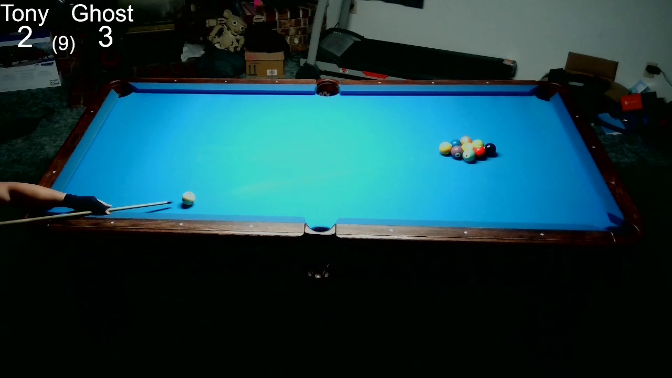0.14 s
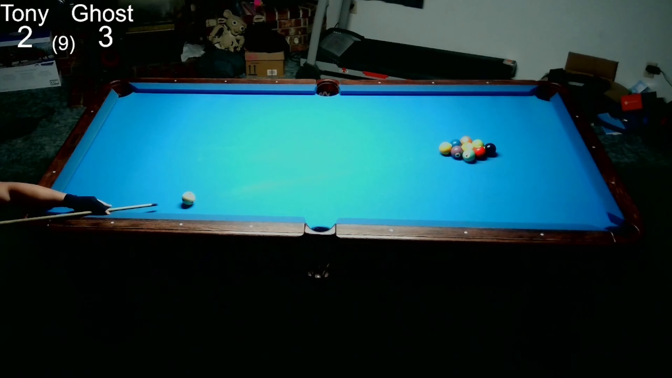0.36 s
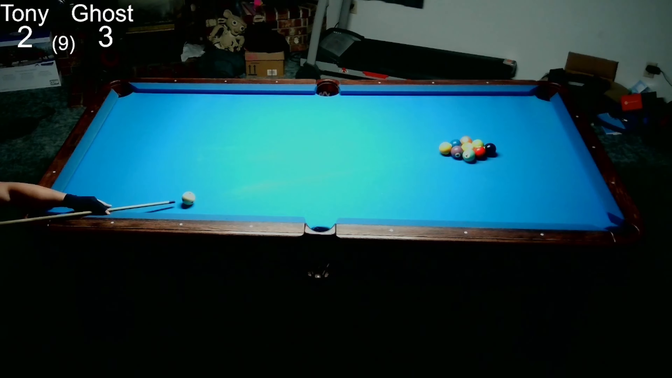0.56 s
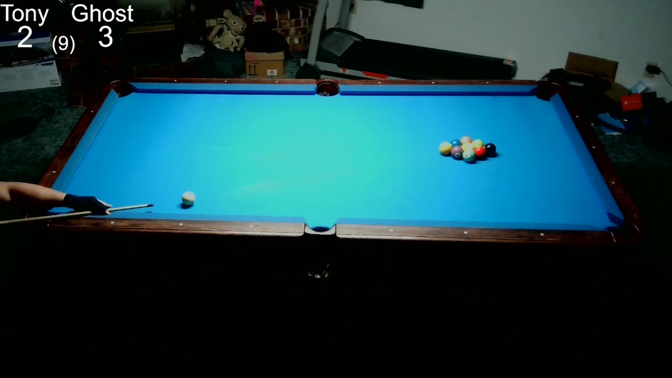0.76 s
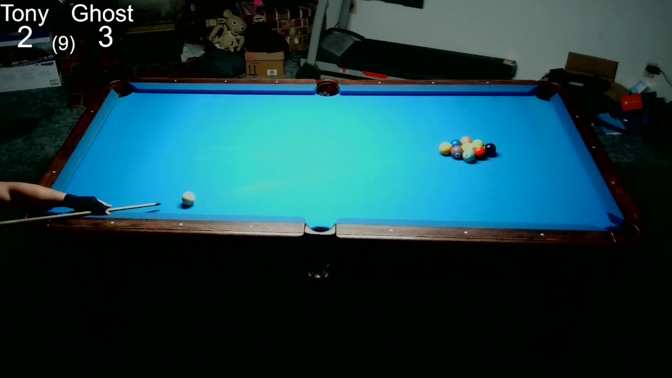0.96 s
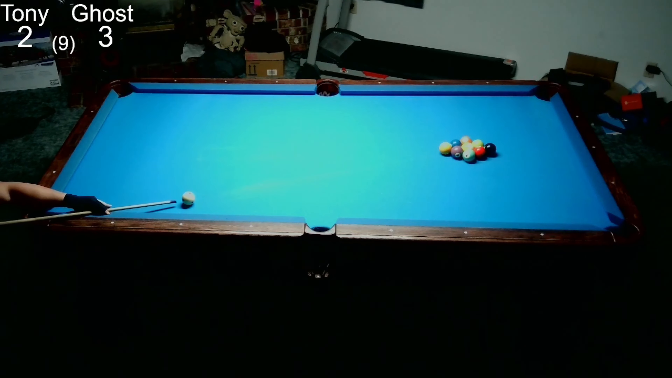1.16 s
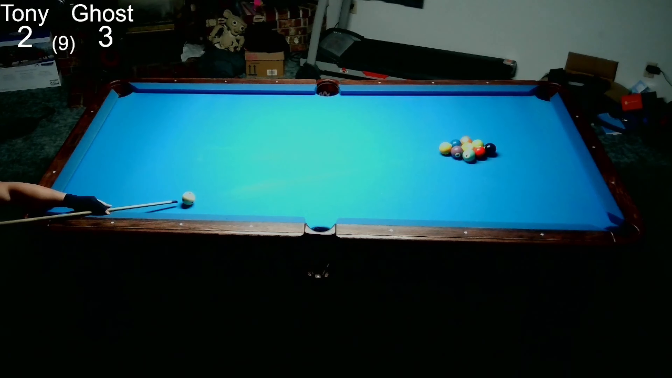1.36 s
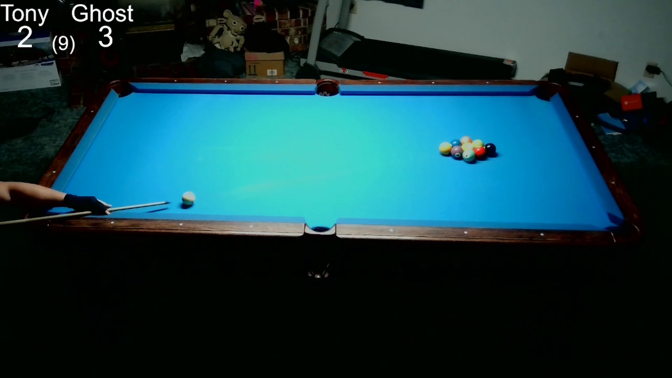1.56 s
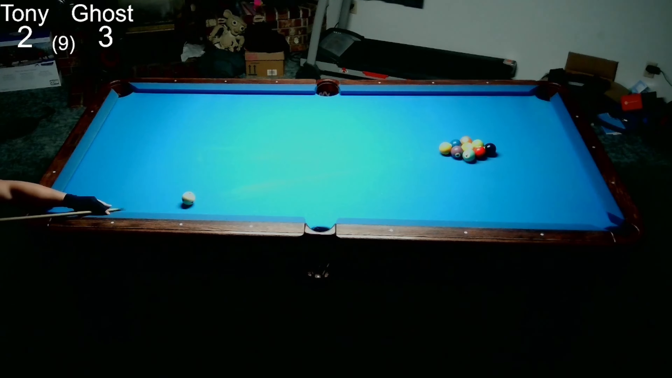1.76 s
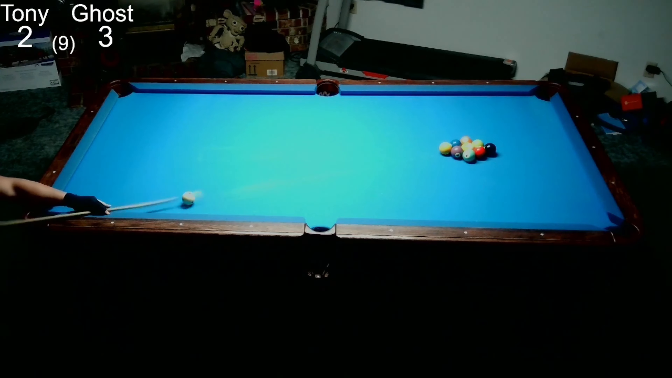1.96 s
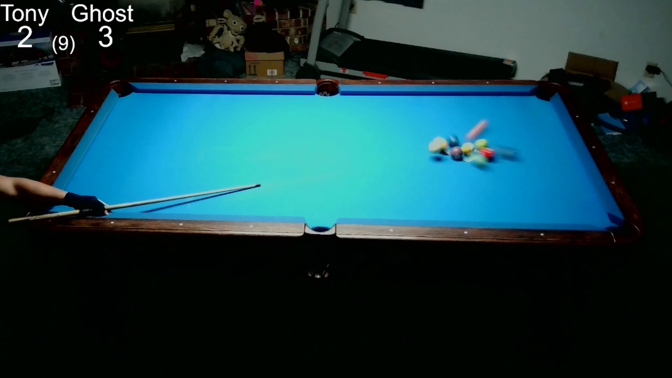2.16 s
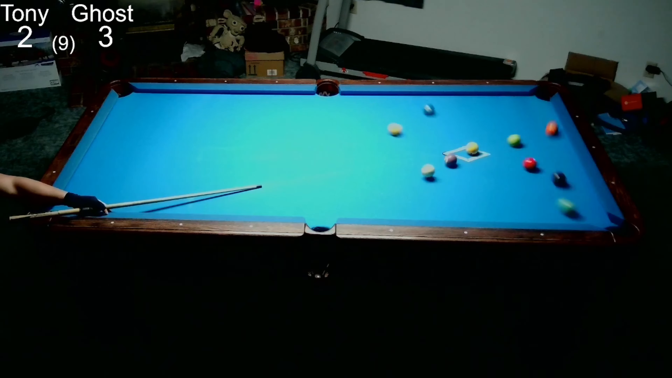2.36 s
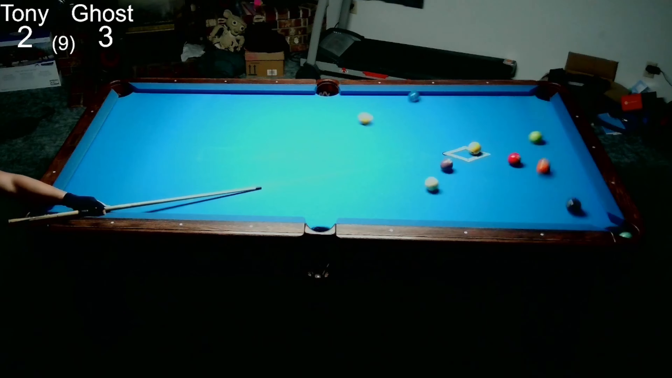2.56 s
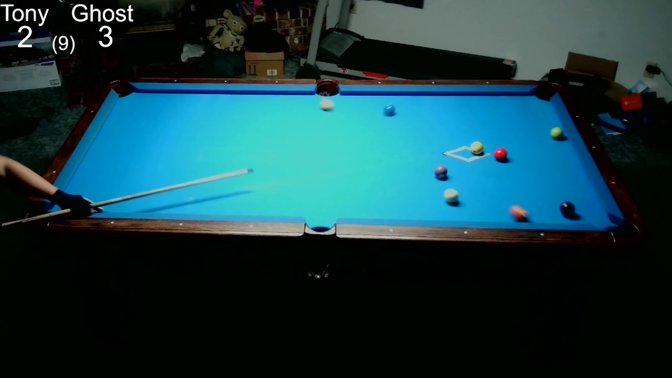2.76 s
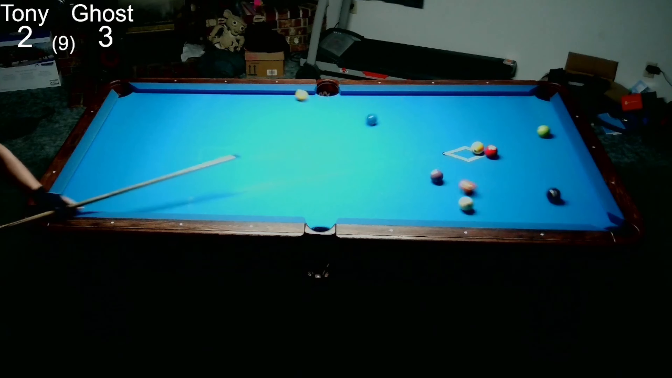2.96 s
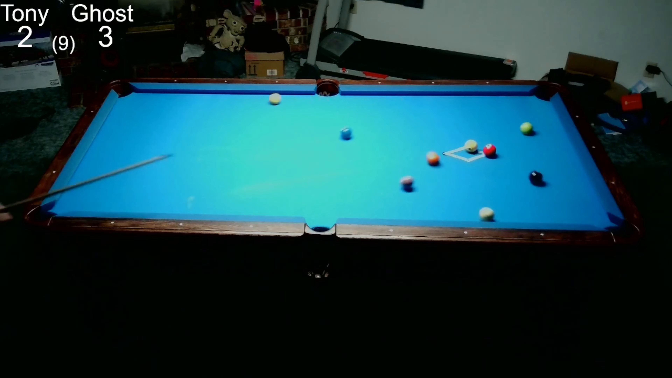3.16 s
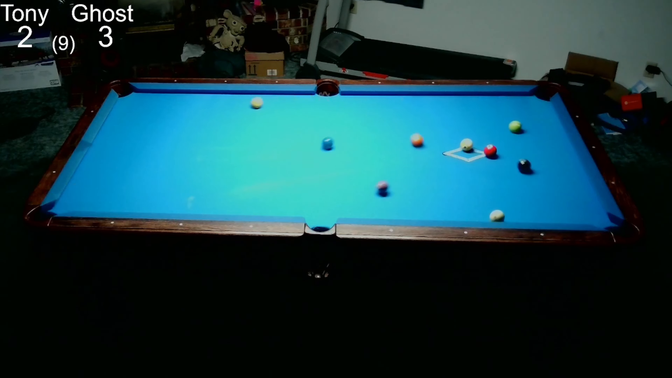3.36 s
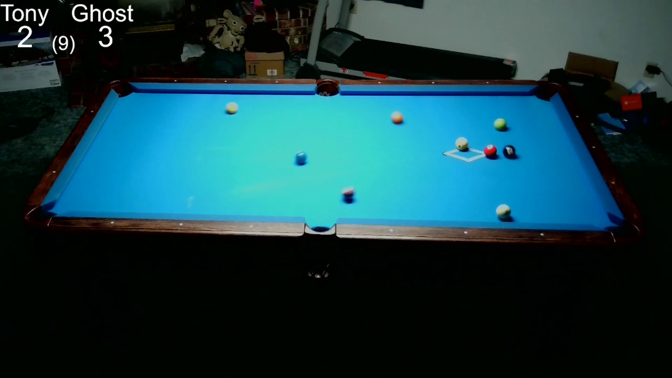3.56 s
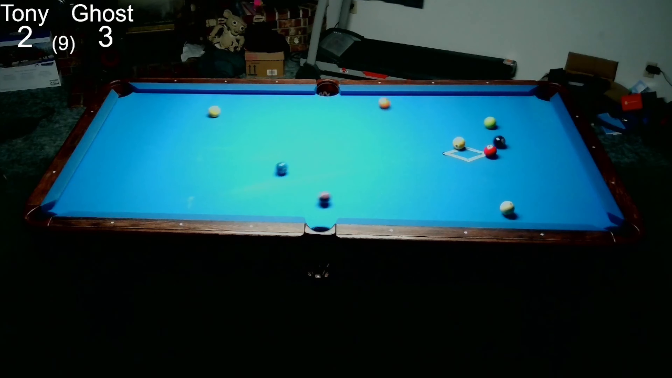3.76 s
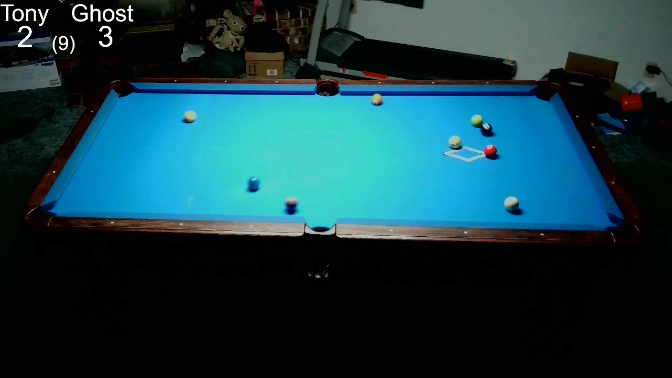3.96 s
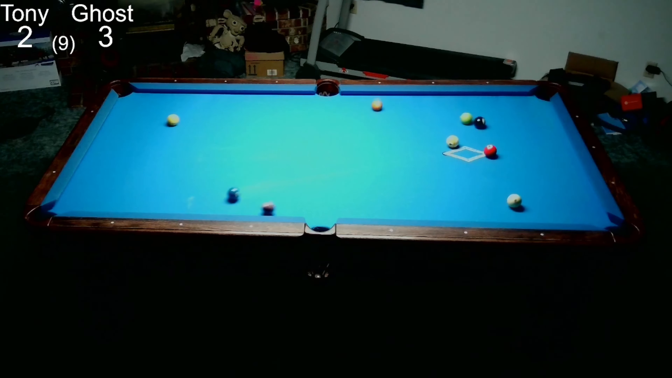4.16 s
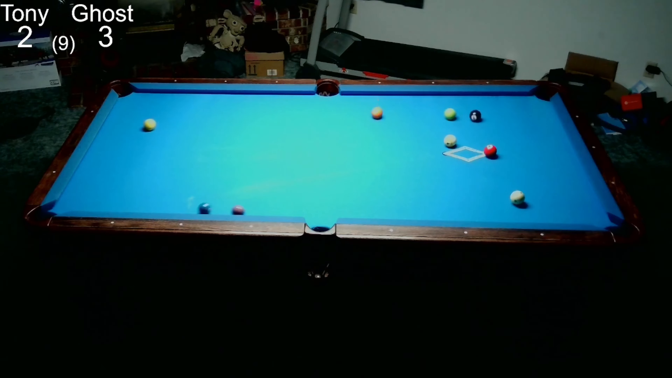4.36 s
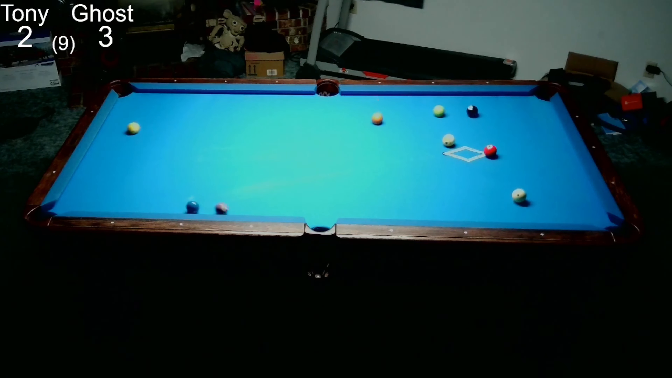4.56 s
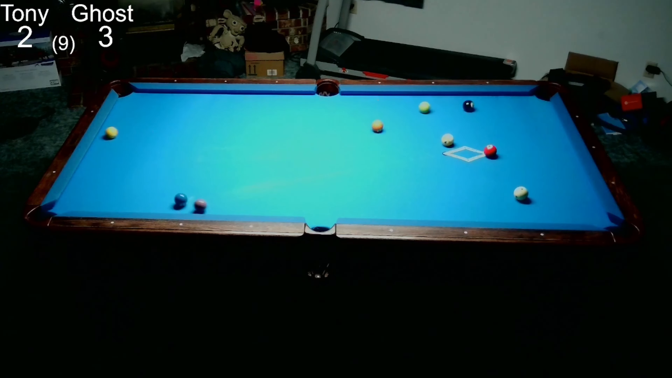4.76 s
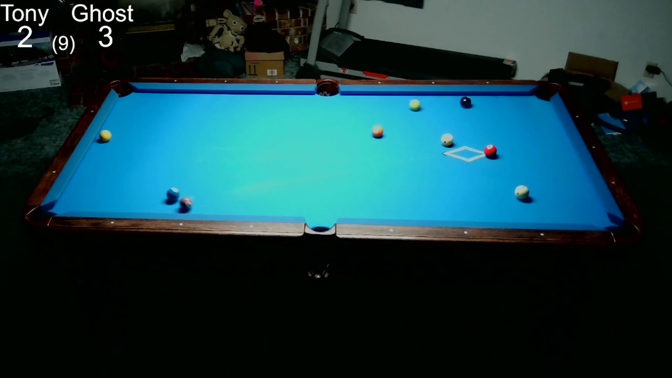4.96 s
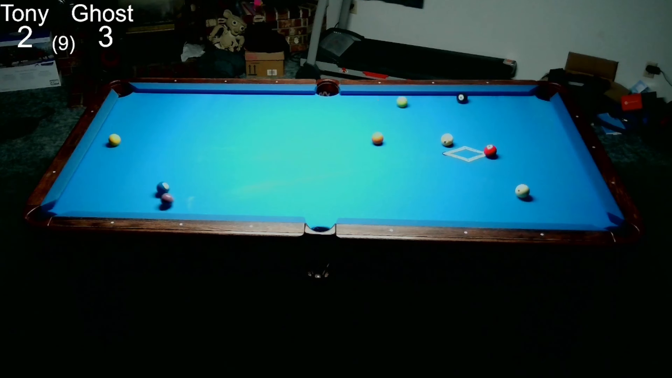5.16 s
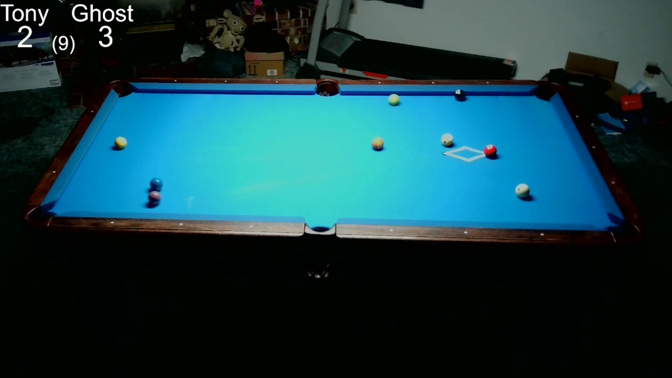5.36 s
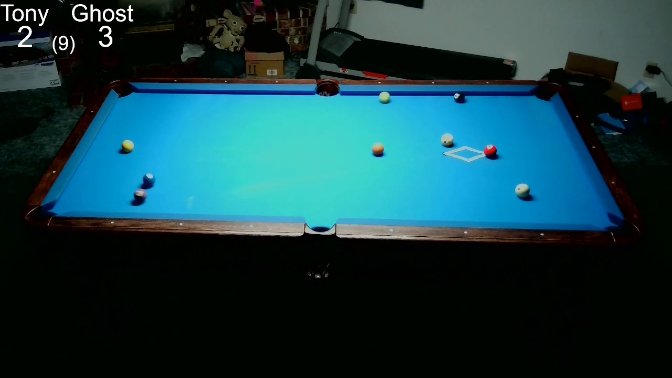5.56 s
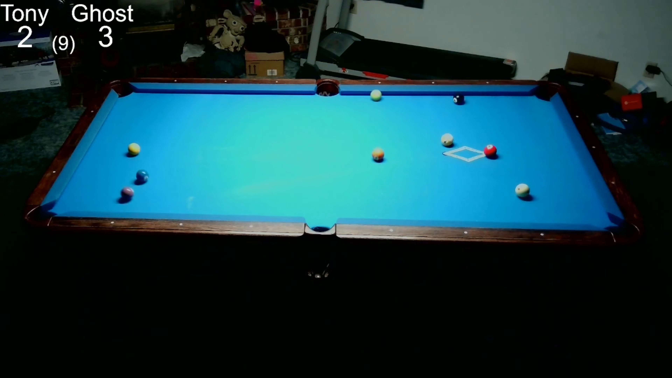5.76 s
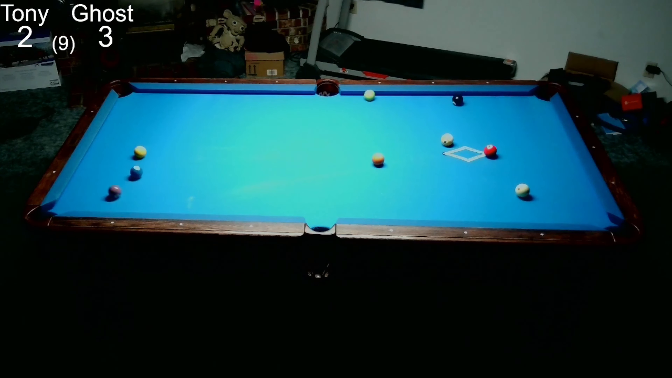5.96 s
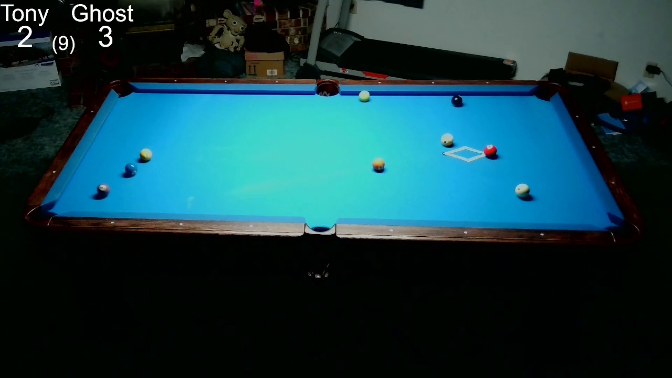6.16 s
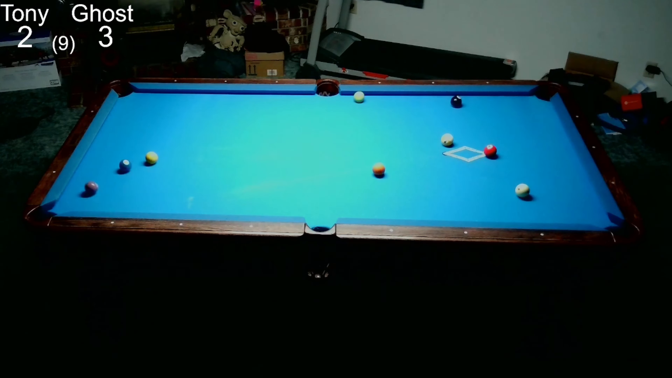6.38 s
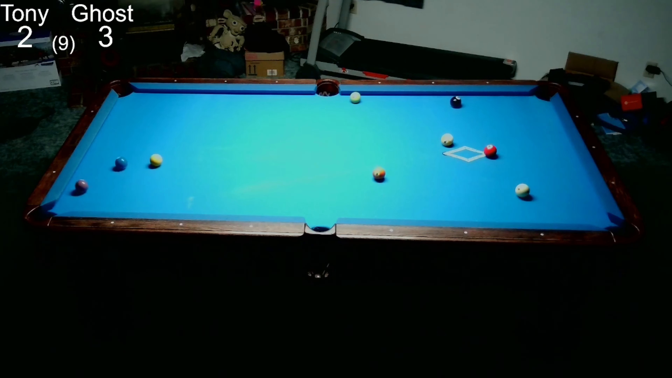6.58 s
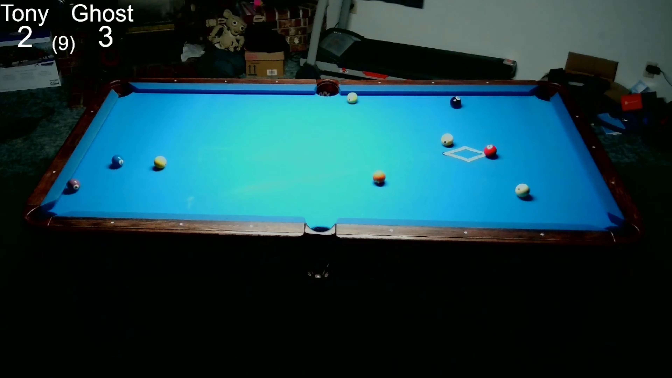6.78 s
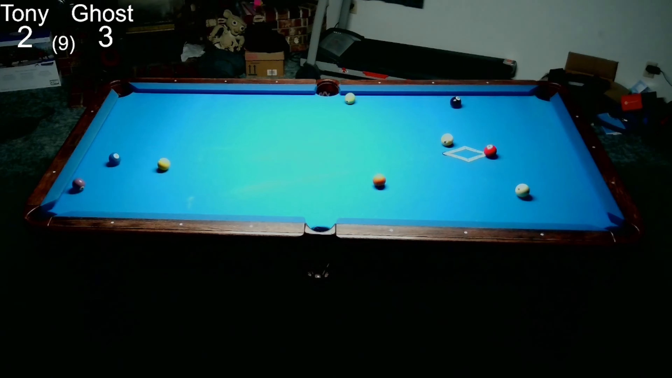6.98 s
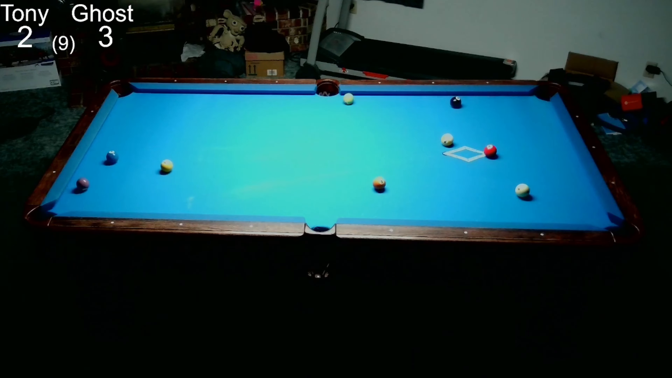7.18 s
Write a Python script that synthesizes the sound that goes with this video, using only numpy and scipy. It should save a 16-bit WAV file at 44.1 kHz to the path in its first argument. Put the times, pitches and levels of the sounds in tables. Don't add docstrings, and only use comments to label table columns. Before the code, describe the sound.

Pool break shot heard from a fixed microphone some way from the table. Low electrical hum waits, then a woody cue crack and an almost immediate, violent shower of ball clacks. Dull thuds on cushions and pockets tumble after it for under a second, with one more clear clack. Balls murmur faintly over cloth; later come tiny clicks, a heel knock and faint leather creaks.

```python
import sys
import numpy as np
from scipy import signal
from scipy.fft import rfft, irfft
from scipy.io import wavfile
from scipy.ndimage import map_coordinates

SR = 44100
rng = np.random.default_rng(int(sys.argv[2]) if len(sys.argv) > 2 else 0)


def amplitude_ratio(level_db):
    exponent = np.asarray(level_db, float) / 20
    return 10 ** exponent


def to_wav(sig):
    pcm = np.clip(np.atleast_2d(sig), -1, 1) * 32767
    pcm = np.round(pcm).astype(np.int16)
    wavfile.write(sys.argv[1], SR, pcm.T)


N = 318574


def at_hz(points, hz):
    points = np.array(points)
    return np.interp(np.log(hz), np.log(points[:, 0]), points[:, 1])


def rms_one(x):
    return x / np.sqrt(np.mean(x ** 2) + 1e-20)


def band_pass(x, low_hz, high_hz, order=2):
    return signal.sosfilt(signal.butter(order, [low_hz, high_hz], "band", fs=SR, output="sos"), x)


def add(track, start_s, sound):
    i = int(round(start_s * SR))
    track[i:i + len(sound)] += sound[:N - i]


def coloured(spectrum):
    hz = np.maximum(np.fft.rfftfreq(N, 1 / SR), 1)
    white = rfft(rng.standard_normal(N))
    return rms_one(irfft(white * amplitude_ratio(at_hz(spectrum, hz)), N))


def drift(rate_hz):
    knots = rng.standard_normal(400)
    return map_coordinates(knots, [np.arange(N) / SR * rate_hz], order=3)


def ring(drive, modes):
    out = 0
    for k, (hz, db, t60_s) in enumerate(modes):
        radius = amplitude_ratio(-60 / (t60_s * SR))
        angle = 2 * np.pi * hz / SR
        numerator = [0, amplitude_ratio(db) * np.sin(angle)]
        denominator = [1, -2 * radius * np.cos(angle), radius * radius]
        out = out + (-1) ** k * signal.lfilter(numerator, denominator, drive + 1e-18)
    return out


def puff(dies_s):
    t = np.arange(4000) / SR
    return rng.standard_normal(4000) * np.exp(-t / dies_s)


def hum():
    harmonics = [(1, -49), (2, -76), (3, -84), (5, -84), (7, -83), (9, -84), (11, -84), (13, -87),
                 (19, -91), (21, -90)]
    mains_hz = 60.0
    t = np.arange(N) / SR
    lines = 0
    for k, db in harmonics:
        lines = lines + amplitude_ratio(db) * np.sin(2 * np.pi * k * mains_hz * t + k * (k + 2.5))
    return np.sqrt(2) * amplitude_ratio(0.18 + 1.1 * drift(7)) * lines


def fan():
    note = rms_one(ring(rng.standard_normal(N), [(258, 0, .6)]))
    return amplitude_ratio(-77.5 + 1.2 * drift(2.6)) * note


def hiss():
    # f/Hz, density/dB per Hz
    hiss_colour = [(20, 12), (80, 7), (150, -0.5), (300, -3), (1200, -10.5), (5000, -16.5), (9000, -21.5),
                   (16000, -23)]
    return amplitude_ratio(-63) * coloured(hiss_colour)


def cue():
    # t/s, shaft level/dB, crack level/dB
    hits = [
        (1.8682, -17, -15),
        (1.8695, -14, -13),
        (1.8714, -15, -12),
        (1.8745, -17, -14),
        (1.8785, -20, -17),
        (1.9237, -23, -19),
    ]
    # f/Hz, level/dB, t60/s
    shaft_modes = [(220, -20, 0.03), (600, -18, 0.02), (900, -8, 0.015), (1180, -6, 0.015),
                   (1692, -13, .01), (2516, -8, .02), (2885, -2.5, 0.05), (3434, -8, 0.035),
                   (3750, -2, .018), (3940, -3, 0.025), (4490, -2, 0.03), (5580, -6, .05),
                   (6165, -13, 0.015), (10500, -22, .006)]
    blows, chatter = np.zeros((2, N))
    for start_s, shaft_db, crack_db in hits:
        add(blows, start_s, amplitude_ratio(np.array([shaft_db])))
        add(chatter, start_s, amplitude_ratio(crack_db) * puff(.0045))
    crack = band_pass(chatter, 2300, 6200)
    body = band_pass(chatter, 800, 2600, order=1)
    return ring(blows, shaft_modes) + crack + amplitude_ratio(-3) * body + amplitude_ratio(-22) * chatter


def cushions():
    # t/s, rattle level/dB, brightness f/Hz, frame level/dB
    thuds = [(1.955, -25, 810, -29), (2.005, -27, 500, -21), (2.113, -18.5, 750, -45),
             (2.137, -20, 794, -22.5), (2.163, -26.5, 500, -24), (2.237, -18, 1130, -17),
             (2.26, -21, 1140, -30), (2.356, -30.5, 1170, -23), (2.383, -31, 978, -27.5),
             (2.42, -34, 1217, -29.5), (2.444, -33.5, 900, -40), (2.530, -35.5, 900, -34.5),
             (2.56, -35, 698, -42), (2.705, -37, 714, -46), (2.739, -41.5, 700, -44), (3.05, -57, 600, -59)]
    # f/Hz, level/dB, t60/s
    frame_modes = [(110, -11.5, .08), (150, -8, .08), (205, -6, 0.16), (270, -2, .06), (353, -3, .05),
                   (430, -4, .04), (600, -5, .07), (699.2, -4.5, .03), (1156, -5, 0.03)]
    rattle, shake = np.zeros((2, N))
    swell = 1 - np.exp(-np.arange(4000) / SR / .009)
    push = np.hanning(24) / 12
    for start_s, db, hz, frame_db in thuds:
        dull = band_pass(swell * puff(.015), .25 * hz, hz)
        add(rattle, start_s, amplitude_ratio(db + 7) * dull)
        add(shake, start_s + .002, amplitude_ratio(frame_db - 7.5) * push)
    return rattle + ring(shake, frame_modes)


def rolling():
    # t/s, level/dB
    roll_levels = [(2.0, -70), (2.101, -47.5), (2.5, -60), (2.8, -57), (3.1, -68), (3.7, -71), (5.0, -68),
                   (6.2, -67), (7.22, -71.5)]
    # f/Hz, density/dB per Hz
    cloth_colour = [(70, -17.5), (120, 0.5), (255, 6.5), (500, -2.5), (1000, -6), (2500, -13), (5300, -15),
                    (7000, -41.5)]
    knot_s, knot_db = np.transpose(roll_levels)
    level_db = np.interp(np.arange(N) / SR, knot_s, knot_db, left=-140)
    return amplitude_ratio(level_db - 5.0 + 1.5 * drift(14)) * coloured(cloth_colour)


def clack(db, hz):
    t = np.arange(256) / SR
    push = np.sin(2 * np.pi * hz * (.0005 - t)) * np.exp(-((t - .0005) * hz / .5) ** 2)
    push = signal.sosfilt(signal.butter(5, 1.4 * hz, fs=SR, output="sos"), push)
    push = signal.sosfilt(signal.butter(2, 600, "high", fs=SR, output="sos"), push)
    overtone = amplitude_ratio(-29) * np.sin(2 * np.pi * 5300 * t) * np.exp(-((t - .0007) / .00025) ** 2)
    resin_ping = amplitude_ratio(-46) * np.sin(2 * np.pi * 14200 * t) * np.exp(-t / .0006)
    grit = amplitude_ratio(-41.5) * rng.standard_normal(256) * np.exp(-t / 0.00085)
    return amplitude_ratio(db) * (1.5 * push + overtone + resin_ping + grit)


def rack_burst():
    # t/s, length/s, rate/Hz, peak/dB, pitch f/Hz
    burst = (2.0036, .0075, 2950, 1.5, 2850)
    start_s, length_s, rate_hz, db, hz = burst
    shower = np.zeros(N)
    for k, (late, size, tone) in enumerate(rng.standard_normal((60, 3))):
        s = k / rate_hz
        fade_db = -22 * (s / length_s) ** 1.4
        softer = 1 - .3 * min(s / length_s, 1)
        jitter_s = .2 * late * max(s - .0016, 0)
        sound = clack(db + fade_db + 2.5 * size, hz * softer * (1 + .07 * tone))
        add(shower, start_s - .0005 + s + jitter_s, sound)
    return shower * amplitude_ratio([[0], [-1]])


def knocks():
    # t/s, peak/dB, f/Hz, t60/s
    heel_knocks = [
        (2.011, -39, 38.53, .25),
        (2.244, -44, 85, .15),
        (2.725, -55, 205, 1.35),
        (6.091, -36, 130, 0.068),
        (6.094, -41.5, 330, .05),
        (6.105, -52.5, 235, .2),
        (6.133, -42, 49, 0.13),
        (6.165, -39.5, 79, 0.094),
        (6.196, -46, 130, 0.044),
    ]
    out = np.zeros(N)
    t = np.arange(SR // 2) / SR
    for start_s, db, hz, t60_s in heel_knocks:
        add(out, start_s, amplitude_ratio(db - 60 * t / t60_s) * np.sin(2 * np.pi * hz * t))
    return out


def ball_clacks():
    # t/s, peak/dB, room share/dB
    contacts = [(2.027, -15, -3), (2.0293, -8.5, 7.5), (2.0305, -7, -9), (2.0352, -2.5, -2),
                (2.0479, -10.5, 9), (2.055, -16.5, 5), (2.0651, -24, 16), (2.09, -14.5, 2),
                (2.2162, -9.5, 2), (2.236, -24, -15), (2.2409, -18, -2.5), (2.8528, -33.5, 3),
                (2.9026, -17.5, 0), (3.9650, -41, 7.5), (3.9746, -44.5, -1.5)]
    out = np.zeros((2, N))
    for start_s, db, room_db in contacts:
        sound = clack(db, 2450 * 2 ** (.009 * db))
        add(out[0], start_s - .0006, sound)
        add(out[1], start_s - .0006, amplitude_ratio(room_db) * sound)
    return out


def tick(out, start_s, db, hz, octaves, dies_s):
    edge = 4.1 * (np.arange(4000) == 0)
    half_band = 2 ** (octaves / 2)
    snap = band_pass(edge + puff(dies_s), hz / half_band, hz * half_band)
    add(out, start_s, amplitude_ratio(db) * snap / np.abs(snap).max())


def taps():
    # t/s, peak/dB, centre f/Hz
    hard_taps = [(2.4186, -46, 4510), (2.429, -46, 4020), (2.463, -43.5, 2800), (2.6832, -46, 1900),
                 (5.828, -56.5, 9040), (5.975, -54, 2480), (6.0905, -41.5, 2960), (6.0926, -44.5, 1000),
                 (6.630, -54, 10000), (6.6395, -41, 5100), (6.640, -56, 10000), (6.6455, -48, 5100)]
    out = np.zeros(N)
    for start_s, db, hz in hard_taps:
        tick(out, start_s, db, hz, octaves=.6, dies_s=.0026)
    return out


def scuffs():
    # t/s, peak/dB, centre f/Hz, decay/s
    rubs = [(2.690, -54, 2000, .012), (2.707, -52, 3000, .022), (3.75, -63.5, 4460, .028),
            (4.331, -64, 3000, .031), (5.003, -61.5, 2000, .005), (5.37, -58, 600, .02),
            (5.8194, -48.5, 3434, .0083), (6.0905, -48, 3200, .006), (6.137, -58, 3470, .0071),
            (6.597, -55, 1200, .02), (6.62, -56, 2500, .02), (6.645, -50, 1960, .0099),
            (6.66, -54.5, 418, .015), (6.70, -63, 3000, .028), (6.887, -56, 1500, .006)]
    out = np.zeros(N)
    for start_s, db, hz, dies_s in rubs:
        tick(out, start_s, db, hz, 1.9, dies_s)
    return out


def snaps():
    # t/s, peak/dB, decay/s
    dry_snaps = [(4.2305, -45, .0025), (4.2345, -49, .004), (5.465, -57, .008), (5.4766, -47, .004),
                 (6.0909, -43.5, .002), (6.6396, -48, .002)]
    out = np.zeros(N)
    for start_s, db, dies_s in dry_snaps:
        tick(out, start_s, db, 2600, 2.2, dies_s)
    return out


def creaks():
    # t/s, peak/dB, centre f/Hz
    leather_creaks = [(6.66, -57, 5300), (6.685, -58, 5300), (6.811, -59, 1797), (6.82, -58, 856),
                      (6.9305, -57, 4000), (6.96, -59, 3790)]
    out = np.zeros(N)
    for start_s, db, hz in leather_creaks:
        tick(out, start_s, db, hz, octaves=.35, dies_s=.006)
    return out


def room(direct, sent):
    # delay t/s, level/dB
    first_echoes = [(.0024, -7), (.0037, -10.5), (.0054, -12), (.0083, -17.5), (.0112, -20.5),
                    (.0222, -12.5), (.0253, -17)]
    # f/Hz, t60/s
    decay_times = [(150, .3), (500, 0.37), (1500, 0.36), (3000, 0.33), (6000, 0.34), (14000, 0.33)]
    t = np.arange(SR) / SR
    edges_hz = 60 * 2 ** np.arange(0, 8.6, .5)
    white = rng.standard_normal((2, SR))
    tail = 0
    for k, (low, high) in enumerate(zip(edges_hz, np.minimum(edges_hz[1:], 20000))):
        band = band_pass(white[k % 2], low, high)
        tail = tail + band * amplitude_ratio(-60 * t / at_hz(decay_times, np.sqrt(low * high)))
    build_up = 1 - np.exp(-(t / .0047) ** 2)
    tail = amplitude_ratio(-34) * tail * build_up
    early = np.zeros(SR // 10)
    early[0] = 1
    for delay_s, db in first_echoes:
        early[int(delay_s * SR)] += amplitude_ratio(db)
    return signal.fftconvolve(direct, early)[:N] + signal.fftconvolve(sent, tail)[:N]


def scene():
    blows = rack_burst() + ball_clacks()
    blows = blows + cue() * amplitude_ratio([[0], [3]])
    blows = blows + (cushions() + taps() + scuffs() + creaks()) * amplitude_ratio([[0], [1.5]])
    background = hum() + fan() + hiss()
    return (room(*blows) + snaps() + knocks() + rolling() + background)[None]


def low_pass(x):
    return signal.sosfilt(signal.butter(12, 17000, fs=SR, output="sos"), x)


def record(dry):
    overload = .84
    over = dry / overload
    flat = overload * over / (1 + np.abs(over) ** 10) ** (1 / 10)
    cut = signal.sosfilt(signal.cheby2(10, 60, 16900, fs=SR, output="sos"), flat)
    return low_pass(cut)


dry = scene()
out = record(dry)
to_wav(out)
```